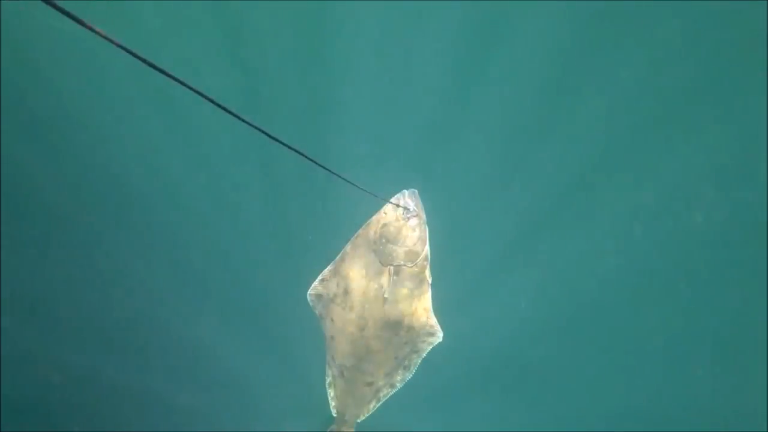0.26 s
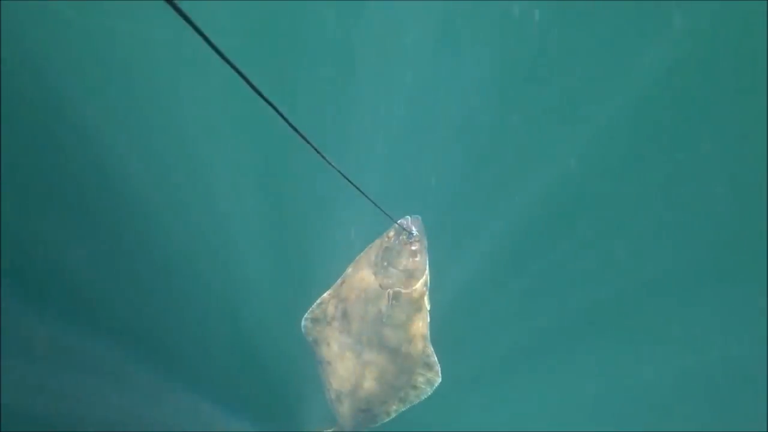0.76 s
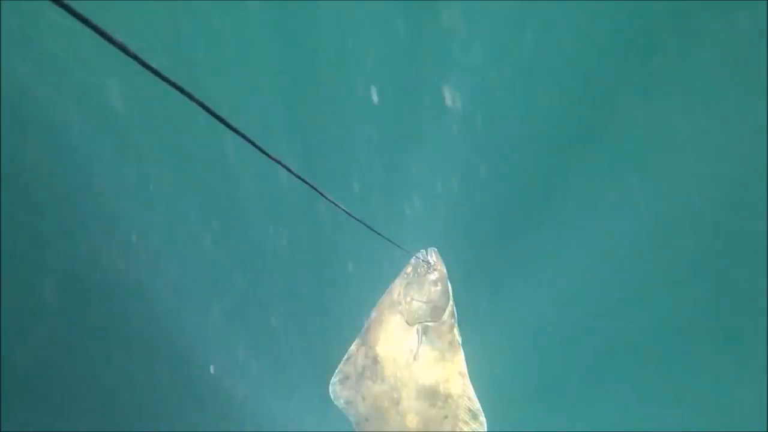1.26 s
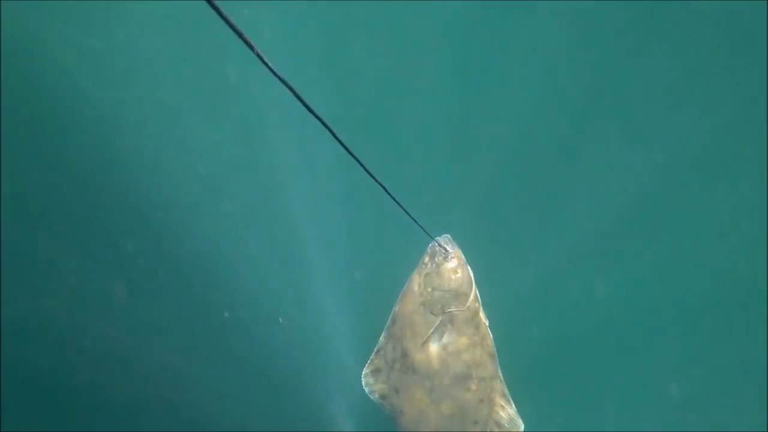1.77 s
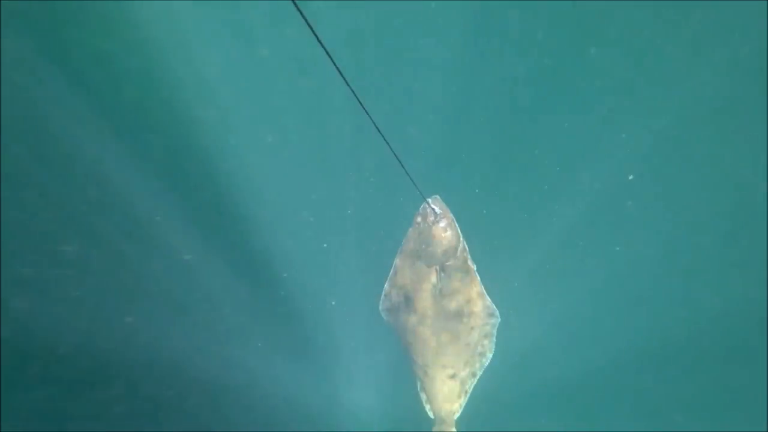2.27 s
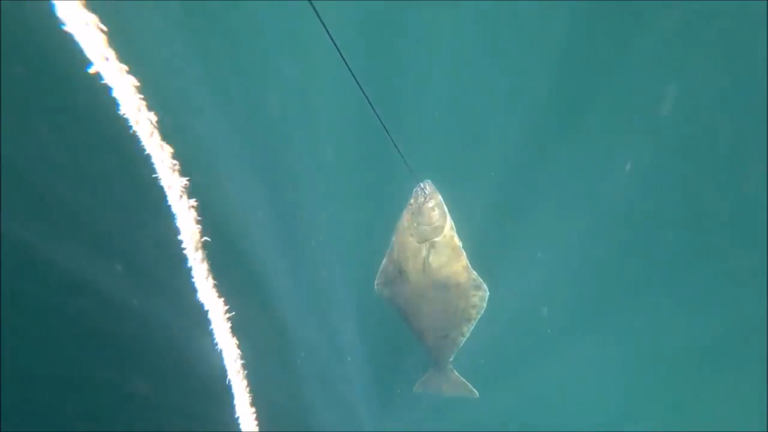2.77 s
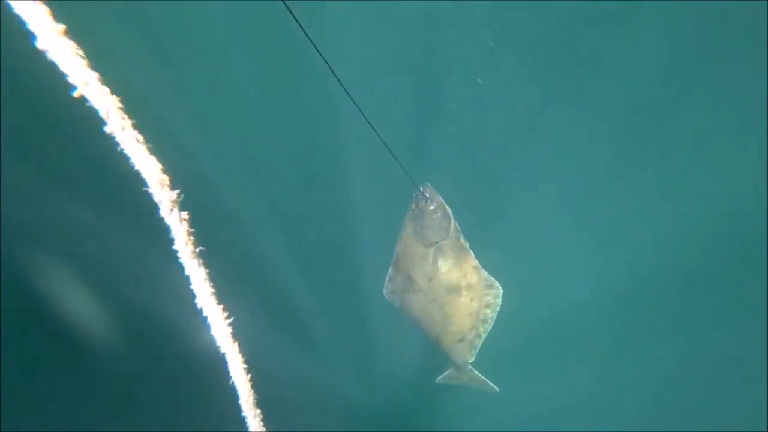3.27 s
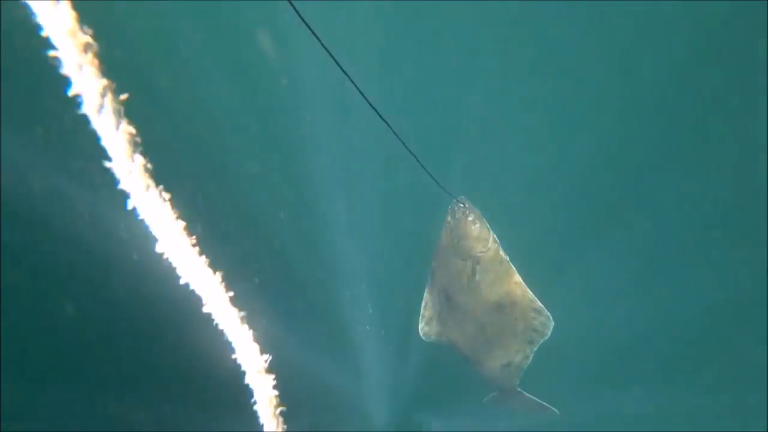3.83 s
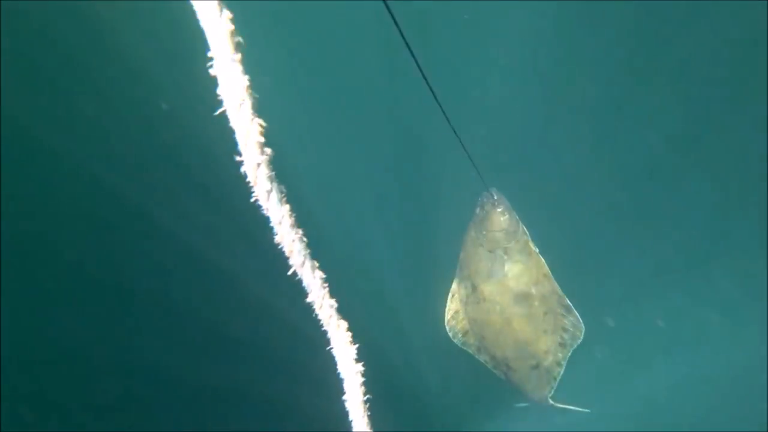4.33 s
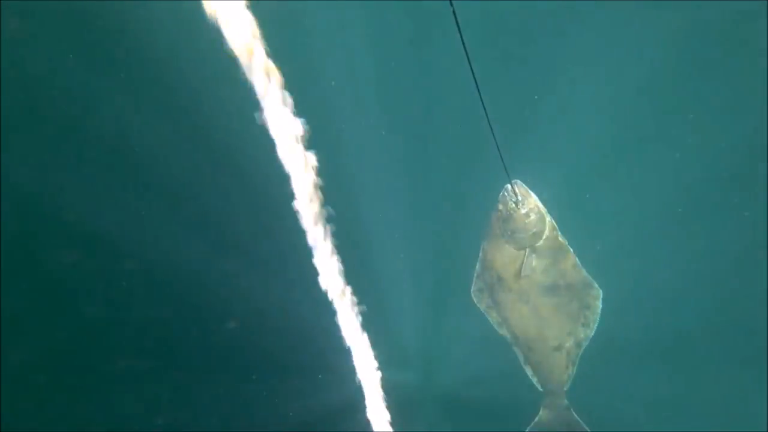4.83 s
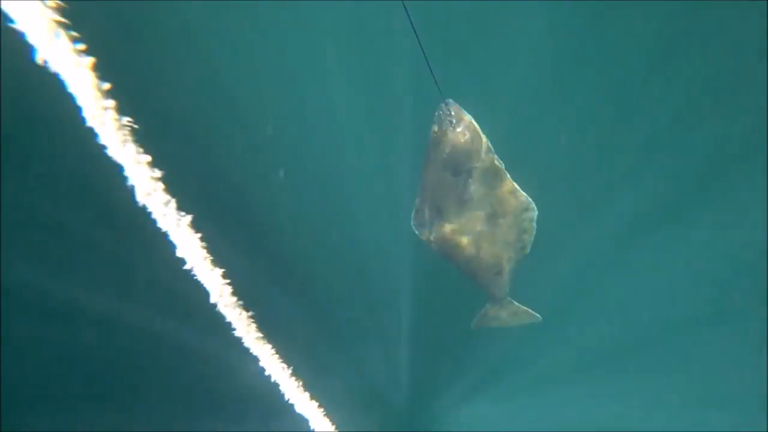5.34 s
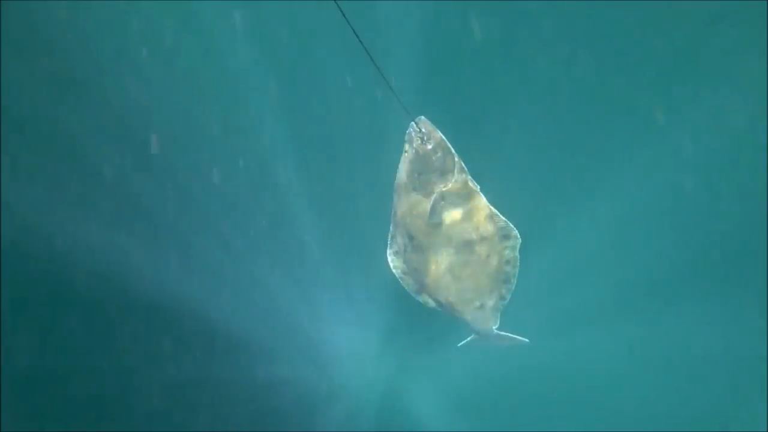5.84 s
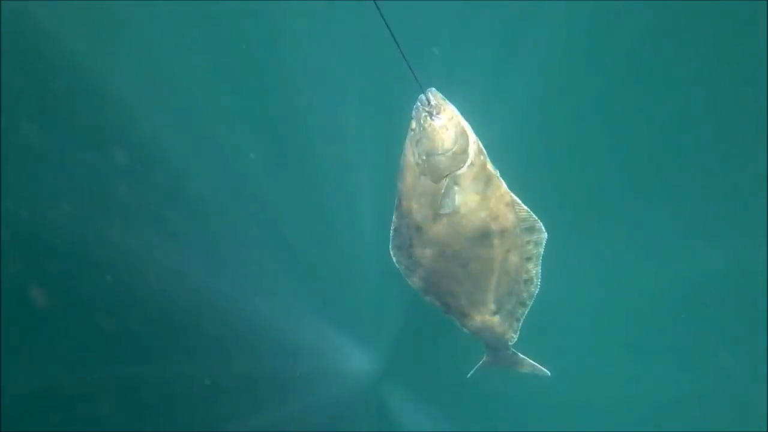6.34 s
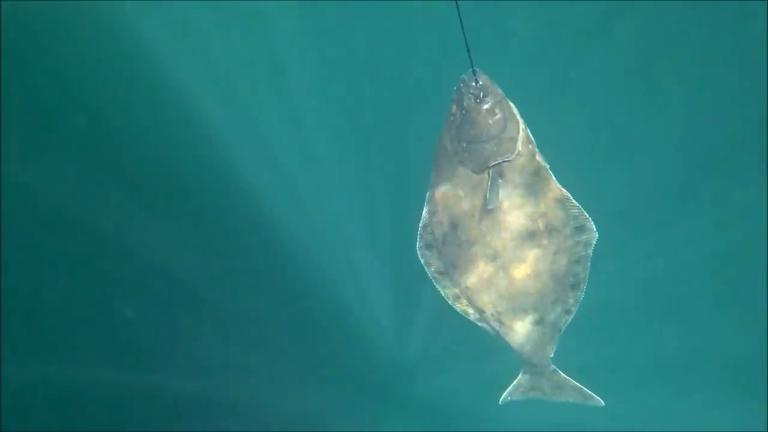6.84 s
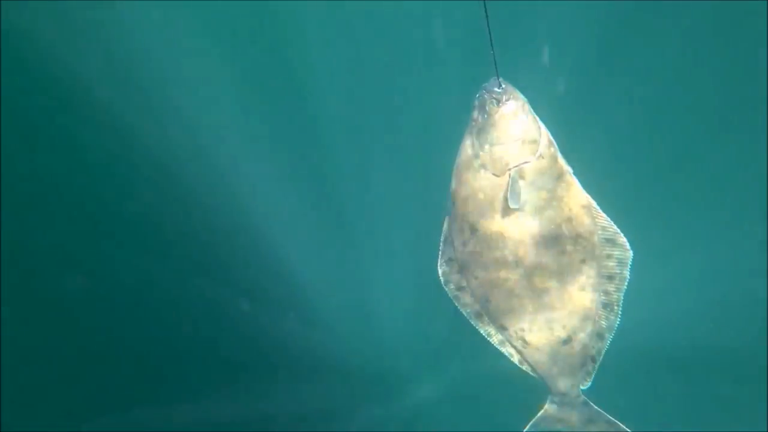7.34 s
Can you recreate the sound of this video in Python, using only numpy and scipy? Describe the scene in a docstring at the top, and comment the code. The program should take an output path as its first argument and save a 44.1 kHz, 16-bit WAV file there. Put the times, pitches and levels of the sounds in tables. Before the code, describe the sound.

An idling boat motor heard underwater, a steady low throb with rapid knocking, under scattered dull bumps and clicks on the microphone.

```python
"""An idling six-cylinder boat motor hums through hull and water into a camera held under the surface.
It thumps low, and each cylinder knocks twice, firing then valve, ringing the hull. The camera's pole
bumps and scrapes, ringing the housing, and rumbles as it is moved. A few bright ticks sit on top, water
wash and hiss behind. The housing moves both microphones together (push) or against each other (twist)."""
import sys
import numpy as np
from scipy import signal
from scipy.fft import rfft, irfft
from scipy.io import wavfile
from scipy.ndimage import uniform_filter1d, minimum_filter1d

SR = 44100
rng = np.random.default_rng(int(sys.argv[2]) if len(sys.argv) > 2 else 0)


def unload_audio(sound):
    """Save the sound as a 16-bit wav file, at the path given as the first command line argument."""
    columns = np.transpose(np.atleast_2d(sound))
    # keep every value between -1 and 1, then stretch to whole-number steps
    steps = np.round(np.clip(columns, -1, 1) * 32767)
    wavfile.write(sys.argv[1], SR, steps.astype(np.int16))


N = 335160
CYCLE_S, FIRST_FIRING_S, CYLINDERS = .17293, .1429, 6

# The motor's faders, riding as the pole's contact with the hull comes and goes.
# Each row: time in seconds, firing tone in dB, thump in dB, contact in dB.
MOTOR_FADERS = [(0.0, -13, -51, 2.5), (0.12, -26.5, -31.5, 7), (0.45, -26, -34.5, 5), (0.6, -35, -35, 9),
                (0.8, -23.5, -29.5, 12), (1.0, -54.5, -27, 1), (1.2, -54, -32.5, 4.5),
                (1.4, -28, -33.5, 6.5), (1.85, -24.5, -30, 7.5), (2.4, -33.5, -30.5, 4.5),
                (2.8, -32.5, -30.5, 2.5), (3.1, -49, -35, 0), (3.4, -32, -32.5, 2.5), (4.15, -30.5, -33, 3),
                (4.6, -21, -27.5, 15), (4.8, -22, -29.5, 10), (5.0, -38, -34.5, -7.5),
                (5.25, -59, -41.5, -29), (5.45, -43, -34, -9), (5.75, -29.5, -34.5, 2.5),
                (6.4, -33, -31, 4), (6.75, -25.5, -30, 12), (7.25, -25, -32.5, 12), (7.6, -37, -31.5, 0)]
# Uneven cylinders fill in the harmonics between multiples of the firing rate.
# Each row: multiple of the engine cycle rate, relative level in dB.
ENGINE_ORDERS = [(1, -46), (2, -37), (3, -30), (4, -26), (5, -21), (6, 0), (7, -24), (8, -12), (9, -8),
                 (10, -23), (11, -21), (12, -4), (13, -19), (14, -29), (15, -18), (16, -24), (17, -27),
                 (18, -25), (19, -30), (20, -25), (21, -28), (22, -35), (23, -30), (24, -17), (25, -27),
                 (26, -31), (27, -40), (28, -30), (29, -29), (30, -17), (31, -38), (32, -33), (33, -35),
                 (36, -30)]
def engine_thump(waver_db=3.54, twist_db=-14, lead_s=.005):
    """The low end: a firing tone that swells on its own, over the wavering throb of uneven cylinders."""
    tone_db, thump_db, contact_db = curves(MOTOR_FADERS)
    cycles = (np.arange(N) / SR - FIRST_FIRING_S + lead_s) / CYCLE_S
    tone = -np.sqrt(2) * amp(tone_db) * np.exp(2j * np.pi * CYLINDERS * cycles)
    knots = np.arange(0, N + SR, SR // 5)
    throb = 0
    for order, db in ENGINE_ORDERS:
        skew = -.07 if order < 18 else -.2  # the wave dips just before the knock, then rises fast
        phase = rng.random() if order % 3 and order % 4 else skew * (order / CYLINDERS - 1)
        waver = np.interp(np.arange(N), knots, rng.standard_normal(len(knots)))
        if order >= 24:  # upper orders come through the pole, so they partly follow contact
            db = db - 2 + .21 * contact_db
        if order != CYLINDERS:
            throb -= amp(db + waver_db * waver) * np.exp(2j * np.pi * (order * cycles + phase))
    throb = np.sqrt(2) * amp(thump_db) * unit_rms(throb)
    return sum(stereo(hum.real, amp(twist_db) * hum.imag) * pan(lean_db)
               for hum, lean_db in ((tone, -.5), (throb, 1.5)))


# One cycle's accents, firing then valve for each cylinder.
# Each row: relative drive in dB into each of the hull's four registers, low to high.
CYLINDER_BLOWS = [(-5, -4, 0, 0), (-20, -8, -8, -12), (-1, -9, -4, -10), (-20, -6, -10, -14),
                  (-4, -2, -1, -8), (-20, -1, -4, -10), (-7, -8, -7, -12), (-20, -12, -9, -12),
                  (0, -9, -2, -9), (-20, -10, -10, -12), (-9, 0, -4, -8), (-20, -4, -8, -12)]
# The hull's resonances. Each row: pitch in Hz, width in Hz, push in dB, twist in dB, twist phase in radians.
HULL_MODES = [(243, 25, -6, -17, 1.4), (330, 60, -6, -16, 1.4), (418, 30, -10, 0, 1.2),
              (455, 35, -19, -3, 1.4), (560, 30, -25, -10, 1.4), (648, 40, -10, -4, 1.4),
              (700, 34, -3, 0, 1.4), (770, 90, -6, -13, 1.4), (886, 38, 0, -12, 1.4),
              (950, 60, -6, -18, 1.4), (1210, 130, -14, -24, 1.4), (1320, 130, -6, -26, 1.4)]
HULL_TOPS_HZ = [600, 800, 1000, 1500]  # where each register ends
def engine_knock(rattle=.55, rattle_s=.007, jitter_s=.0002, steady_noise=.4):
    """Each blow is a sharp tap and a short rattle; the hull rings with them."""
    drive, t = np.zeros((4, N)), np.arange(800) / SR
    for cycle_start in np.arange(FIRST_FIRING_S - CYCLE_S, N / SR, CYCLE_S):
        for k, db in enumerate(CYLINDER_BLOWS):
            uneven_db, late = rng.standard_normal(2)
            rattling = rng.standard_normal(len(t)) * np.exp(-t / rattle_s)
            blow = (1 - rattle) * (t == 0) + rattle * rattling / np.linalg.norm(rattling)
            start = cycle_start + k * CYCLE_S / len(CYLINDER_BLOWS) + jitter_s * late
            add(drive, start, amp(db)[:, None] * amp(uneven_db) * blow)
    drive = np.array([unit_rms(d) for d in drive]) + steady_noise * rng.standard_normal(N)
    hull_lowpass = signal.butter(6, HULL_TOPS_HZ[-1], fs=SR, output="sos")
    push, twist = signal.sosfilt(hull_lowpass, ring(drive, drive, HULL_MODES, HULL_TOPS_HZ))
    contact_db = curves(MOTOR_FADERS)[2]
    push_db, twist_db = -42.5 + .29 * contact_db, -37.5 + contact_db  # firmer contact: louder and wider
    return stereo(amp(push_db) * unit_rms(push), amp(twist_db) * unit_rms(twist))


# The housing's resonances.
# Each row: pitch in Hz, width in Hz, push in dB, twist in dB, twist phase in radians.
HOUSING_MODES = [(181, 75, -3.5, -8, 2.45), (251.2, 44.4, 1, -5, 3.62), (317.6, 59.5, 5.5, -17.5, 2.9),
                 (384, 79, -4, -10.5, 1.2), (553, 47, -9.5, -16.5, 2.8), (676.4, 51, -7, -3.5, 2.3),
                 (761, 150, 2, -1.5, 1.6), (1241, 272, 3, 4.5, 1.85), (1504, 190, -9, -9.5, 1.1),
                 (1747, 92, -4, -14.5, 1.9), (1880, 213, -8.5, -19, 1.6), (2580, 300, -6, -5.5, 1.6),
                 (3090, 250, -16, -7, 1.8), (4180, 660, -22, -40.5, 1.8), (5400, 1800, -29, -18.5, 1.8)]
HOUSING_TOPS_HZ = [450, 1000, 2300, 7000]  # where each register ends
# Dull thuds in the low modes. Each row: time in seconds, length in seconds, drive in dB.
POLE_THUDS = [(0.582, 0.032, -17), (0.61, 0.0073, -12), (0.675, 0.014, -30), (0.695, 0.0071, -15.5),
              (0.781, 0.0087, -13), (0.808, 0.022, -9.5), (0.985, 0.017, -8.5), (1.133, 0.017, -16.5),
              (1.151, 0.031, -11), (1.168, 0.011, -12), (1.202, 0.0099, -21), (1.331, 0.011, -15.5),
              (1.379, 0.009, -16), (1.47, 0.0066, -23), (1.489, 0.011, -17), (1.557, 0.01, -19.5),
              (1.677, 0.0065, -16.5), (1.816, 0.0051, -25), (2.003, 0.036, -12), (2.044, 0.0098, -11),
              (2.133, 0.035, -12.5), (2.184, 0.01, -18), (2.231, 0.01255, -15), (2.466, 0.0069, -19),
              (3.077, 0.0053, -15), (3.099, 0.011, -20.5), (3.192, 0.0062, -16), (3.209, 0.053, -19.5),
              (4.909, 0.0029, -18), (5.257, 0.019, -23.5), (5.362, 0.00634, -14.5), (7.204, 0.0079, -36),
              (7.269, 0.012, -21)]
# Harder raps in the mids.
# Each row: time in seconds, length in seconds, drive in dB, hardness in dB (higher is brighter).
POLE_RAPS = [(0.231, 0.0063, -28, 2.5), (0.287, 0.0059, -27.5, -8), (0.382, 0.0081, -30.5, -8),
             (0.545, 0.0065, -34.5, 9), (0.579, 0.018, -32.5, -5), (0.599, 0.0056, -34, 3),
             (0.61, 0.0082, -32, -2), (0.656, 0.013, -35, 5), (0.694, 0.00617, -22.5, -22),
             (0.79, 0.01, -28.5, 1), (0.804, 0.008, -23, -10), (0.8163, 0.011, -16, 11),
             (0.822, 0.0092, -17, -4.5), (0.961, 0.0097, -22, -7), (0.975, 0.0092, -18.5, -16.5),
             (0.985, 0.017, -32, -9), (1.131, 0.016, -19.5, -10.5), (1.192, 0.008, -30.5, -2),
             (1.246, 0.0084, -40, 11.5), (1.348, 0.012, -20, -13.5), (1.371, 0.006, -28.5, 7),
             (1.47, 0.0073, -20.5, -10), (1.506, 0.015, -28, -9), (1.523, 0.011, -22, -17),
             (1.557, 0.0071, -39.5, 16), (1.82, 0.011, -26, -11), (1.846, 0.029, -34, 0.5),
             (2.0, 0.035, -21.5, -16), (2.043, 0.0093, -19.5, -4), (2.109, 0.012, -26, -6),
             (2.13, 0.041, -27.5, -3), (2.159, 0.0061, -27, -15), (2.197, 0.018, -37, 1),
             (2.231, 0.015, -20, -3.5), (2.447, 0.0056, -35, -5), (2.479, 0.0091, -26.5, -21),
             (2.649, 0.024, -28.5, -6), (2.881, 0.012, -32, -4), (2.908, 0.014, -27, -7),
             (2.964, 0.0086, -32.5, -4), (3.004, 0.012, -29, -8), (3.082, 0.0086, -25, -26),
             (3.097, 0.012, -23.5, -9), (3.163, 0.0088, -35, -14), (3.239, 0.021, -29, 5.5),
             (3.293, 0.011, -32.5, 14), (3.338, 0.013, -22, -5), (3.491, 0.028, -27, -7.5),
             (3.59, 0.0069, -30, -3), (3.631, 0.0091, -29.5, -9), (4.877, 0.0097, -41, -4),
             (4.906, 0.0084, -30, -19), (5.061, 0.0095, -31.5, -1), (5.358, 0.015, -21.5, -6.5),
             (5.409, 0.008, -25.5, -10), (5.495, 0.006, -25.5, -1.5), (5.689, 0.014, -32.5, -3),
             (5.71, 0.017, -29.5, -2), (5.584, 0.0077, -42.5, 14), (5.752, 0.0063, -39.5, 10),
             (5.827, 0.0053, -42, 8), (5.896, 0.005, -39, 3), (5.966, 0.0041, -45, 8),
             (6.028, 0.005, -42, 7), (6.106, 0.0047, -40, 8), (6.138, 0.0091, -36, -20),
             (6.193, 0.01, -29, -20), (6.307, 0.0098, -46, -19), (6.448, 0.0095, -28.5, -11.5),
             (6.793, 0.016, -31.5, -8), (6.952, 0.0068, -42, -11), (7.268, 0.011, -31.5, -7)]
# Further short bumps, ringing mostly the top modes. Each row: time in seconds, length in seconds, drive in dB.
POLE_HIGH_BUMPS = [(0.679, 0.03, -47), (0.82, 0.015, -37), (1.998, 0.02, -41.5), (2.127, 0.055, -39),
                   (2.227, 0.014, -40), (2.561, 0.0078, -42), (2.89, 0.019, -51.5), (3.091, 0.021, -47.5),
                   (3.293, 0.016, -55), (3.337, 0.022, -47), (4.869, 0.0064, -39.5), (5.368, 0.013, -46),
                   (5.376, 0.0092, -42), (5.398, 0.018, -36), (5.41, 0.0059, -17), (5.423, 0.0036, -32),
                   (5.43, 0.006, -30), (5.712, 0.015, -49), (6.753, 0.014, -50), (6.787, 0.013, -50)]
def pole_bumps(rise=.5, grit_db=3.5):
    """Each thud, rap or high bump is a gritty burst that swells and dies, ringing the housing."""
    thud_eq_db = np.array([0, -15, -27.5, -63])  # by register, low to high
    rap_eq_db, hardness_tilt = np.array([[-13, 0, 0, -35], [.24, -.38, .69, .6]])
    high_eq_db = np.array([-26, -20.5, -14, .5])
    thuds = [(s, length, db + thud_eq_db) for s, length, db in POLE_THUDS]
    raps = [(s, length, db + rap_eq_db + hard * hardness_tilt) for s, length, db, hard in POLE_RAPS]
    scrapes = [(s, length, db + high_eq_db) for s, length, db in POLE_HIGH_BUMPS]
    push, twist = np.zeros((2, 4, N))
    for bumps, twist_db in ((thuds, 8), (raps, 7.5), (scrapes, -2.5)):
        for s, length, db in bumps:
            age = np.arange(-rise, 4, 1 / (length * SR))  # in bump lengths from the crest
            envelope = np.where(age < 0, (1 + age / rise) ** 2, np.exp(-2 * age))
            noise, grit = rng.standard_normal((2, 12000))[:, :len(age)]
            burst = envelope * noise * amp(grit_db * unit_rms(uniform_filter1d(grit, 60)))
            burst *= np.linalg.norm(envelope) / np.linalg.norm(burst)  # grit leaves the strength alone
            drive = amp(db)[:, None] * burst / np.sqrt(1 + amp(2 * twist_db))
            add(push, s - rise * length, drive)
            add(twist, s - rise * length, amp(twist_db) * drive)
    return stereo(*ring(push, twist, HOUSING_MODES, HOUSING_TOPS_HZ))


# The fader for the pole being moved about. Each row: time in seconds, level in dB.
HANDLING_FADER = [(0.0, -45.5), (0.55, -34), (2.1, -41.5), (2.3, -45.5), (3.1, -40.5), (4.1, -46.5),
                  (4.6, -46.5), (5.8, -41), (6.2, -45.5), (7.2, -43), (7.6, -52.5)]
# The rumble's bass-heavy colour. Each row: frequency in Hz, relative level in dB.
RUMBLE_EQ = [(12, -27), (30, -44.5), (80, 16.5), (200, -3), (330, 10), (500, -1.5), (900, -48.5)]
def pole_handling(rumble_db=-1, lumps_db=3, scrape_db=-6, twist_db=4, scrapes_per_s=110):
    """Moving the pole makes a lumpy rumble and small random scrapes in the housing."""
    level_db, = curves(HANDLING_FADER)
    rumble = np.array([unit_rms(coloured(side, RUMBLE_EQ)) for side in noise_pair(alike=.4)])
    lumps = amp(lumps_db * unit_rms(uniform_filter1d(rng.standard_normal(N), 2500)))
    sizes = amp(2.8 * np.minimum(rng.exponential(1, N), 4))
    onsets = rng.random(N) < scrapes_per_s / SR
    envelope = signal.lfilter([1], [1, -.995], sizes * onsets)
    drive = envelope * rng.standard_normal(N) * amp([[-3], [-4], [-14], [-32]])  # by register
    push, twist = ring(drive, drive, HOUSING_MODES, HOUSING_TOPS_HZ)
    scrapes = stereo(unit_rms(push), amp(twist_db) * unit_rms(twist))
    return amp(level_db) * (amp(rumble_db) * lumps * rumble + amp(scrape_db) * scrapes)


# Bright pinpoints. Each row: start in seconds, level in dB, pitch in Hz, left minus right in dB.
BRIGHT_TICKS = [(0.2703, -51, 6540, -7), (0.68, -56, 10000, -5), (0.8133, -34, 3580, -1),
                (2.875, -59, 10000, 0), (3.011, -51.5, 6550, -12), (3.3438, -48, 3580, -2),
                (5.365, -53, 3800, -24), (5.41, -36, 3900, 3), (5.494, -47, 5400, -8),
                (5.5783, -38, 4170, 6), (5.5897, -42.5, 10100, -11)]
def ticks(snap_db=-8, snap_s=.00086, t60_s=.0078):
    """Tiny hard taps: a wide snap and one short bright ring."""
    out, t = np.zeros((2, N)), np.arange(3000) / SR
    for start, db, hz, lean_db in BRIGHT_TICKS:
        snap = amp(snap_db) * np.diff(rng.standard_normal((2, len(t) + 1))) * np.exp(-t / snap_s)
        ping = np.sin(2 * np.pi * hz * t) * amp(-60 * t / t60_s)
        add(out, start, amp(db) * pan(lean_db) * (ping + snap))
    return out


# The water's midrange colour. Each row: frequency in Hz, relative level in dB.
WASH_EQ = [(700, -26), (1300, -6), (1900, -6), (2300, -15), (3200, -18.5), (4500, -23), (7000, -42)]
def water_wash(level_db=-60.5):
    """A steady, wide bed of water noise."""
    return amp(level_db) * unit_rms(coloured(noise_pair(alike=-.2), WASH_EQ))


# The airy colour of the hiss. Each row: frequency in Hz, relative level in dB.
HISS_EQ = [(1500, -14), (3000, -27.5), (5000, -2), (9000, -5), (10000, -5.5), (12500, -1), (15500, -5)]
def microphone_hiss(level_db=-70.5):
    """The microphones' own faint, steady noise."""
    return amp(level_db) * unit_rms(coloured(noise_pair(alike=.45), HISS_EQ))


def ring(push_drive, twist_drive, modes, tops_hz):
    """Each mode rings on its register's drive, muffled and softly started, as through water."""
    muffles = [signal.butter(2, 1.2 * top, fs=SR, output="sos") for top in tops_hz]
    push_drive = [signal.sosfilt(m, d) for m, d in zip(muffles, push_drive)]
    twist_drive = [signal.sosfilt(m, d) for m, d in zip(muffles, twist_drive)]
    push, twist = np.zeros((2, N))
    for hz, width, push_db, twist_db, phase in modes:
        register = np.searchsorted(tops_hz, hz)
        radius = np.exp(-np.pi * 1.55 * width / SR)
        pole = [1, -radius * np.exp(2j * np.pi * hz / SR)]
        resonator = np.convolve(pole, pole)  # doubled for a soft attack
        gain = np.sqrt(2 * (1 - radius ** 2) ** 3 / (1 + radius ** 2))
        gain *= (-1) ** register  # neighbouring registers swing against each other, leaving quiet gaps
        pushed, twisted = signal.lfilter([1], resonator, [push_drive[register], twist_drive[register]])
        push += amp(push_db) * gain * pushed.real
        twist += amp(twist_db) * gain * (np.exp(1j * phase) * twisted).real
    return push, twist


def stereo(push, twist):
    """Left and right microphone from common and opposite motion."""
    return np.array([push + twist, push - twist])


def pan(lean_db):
    """Left and right gains, lean_db apart."""
    return amp([[lean_db / 2], [-lean_db / 2]])


def noise_pair(alike):
    """Stereo white noise whose sides correlate by `alike`."""
    left, other = rng.standard_normal((2, N))
    return np.array([left, alike * left + np.sqrt(1 - alike ** 2) * other])


def coloured(x, eq):
    """Shapes x with an EQ curve of (Hz, dB) points."""
    hz, db = np.transpose(eq)
    bins_hz = np.fft.rfftfreq(N, 1 / SR)
    return irfft(rfft(x) * amp(np.interp(np.log(bins_hz + 1), np.log(hz + 1), db, left=-100)), N)


def curves(rows):
    """Each fader of a time table, one value a sample."""
    s, *faders = np.transpose(rows)
    return [np.interp(np.arange(N) / SR, s, fader) for fader in faders]


def amp(db):
    """Gain for a level in dB."""
    return 10 ** (np.asarray(db, float) / 20)


def unit_rms(x):
    """Scales to rms 1."""
    return x / np.sqrt(np.mean(abs(x) ** 2) + 1e-20)


def add(track, s, sound):
    """Mixes a short sound in at time s."""
    part = track[..., max(round(s * SR), 0):][..., :sound.shape[-1]]
    part += sound[..., :part.shape[-1]]


def scene():
    """Motor, pole and ticks over a bed of wash and hiss."""
    bed = water_wash() + microphone_hiss()
    return engine_thump() + engine_knock() + pole_bumps() + pole_handling() + ticks() + bed


def record(dry, ceiling=.93, span_samples=221, cutoff_hz=15750):
    """A limiter eases the gain down around any peak over the ceiling; a low-pass trims the very top."""
    allowed = np.minimum(ceiling / (abs(dry).max(0) + 1e-9), 1)
    gain = uniform_filter1d(minimum_filter1d(allowed, span_samples), span_samples)
    lowpass = signal.firwin(511, cutoff_hz, window=("kaiser", 9), fs=SR)
    return signal.oaconvolve(dry * gain, lowpass[None], "same")


dry = scene()
out = record(dry)
unload_audio(out)
```